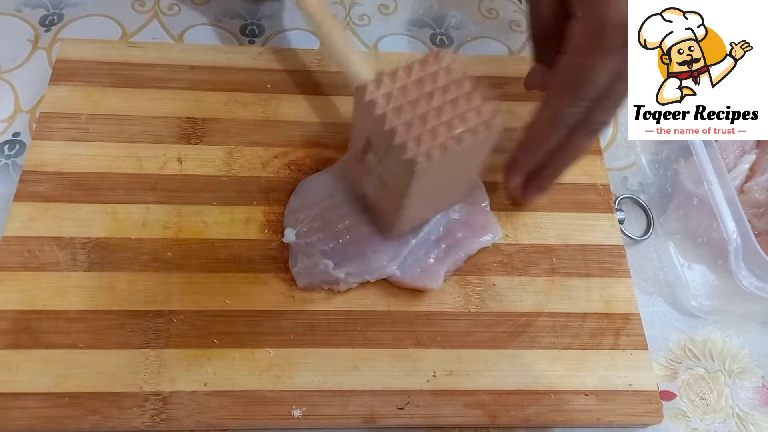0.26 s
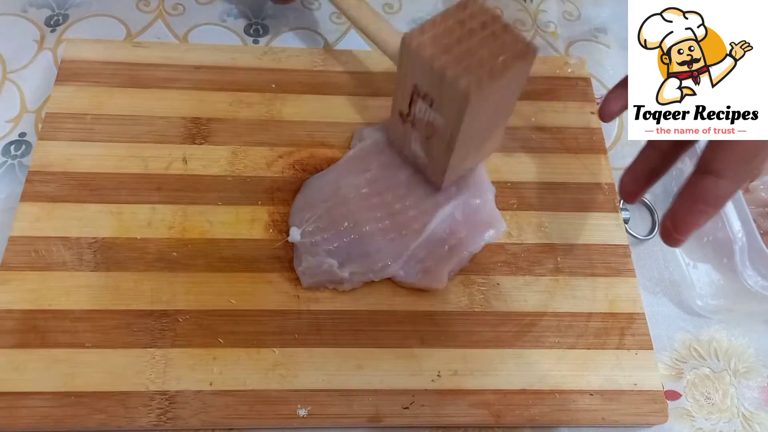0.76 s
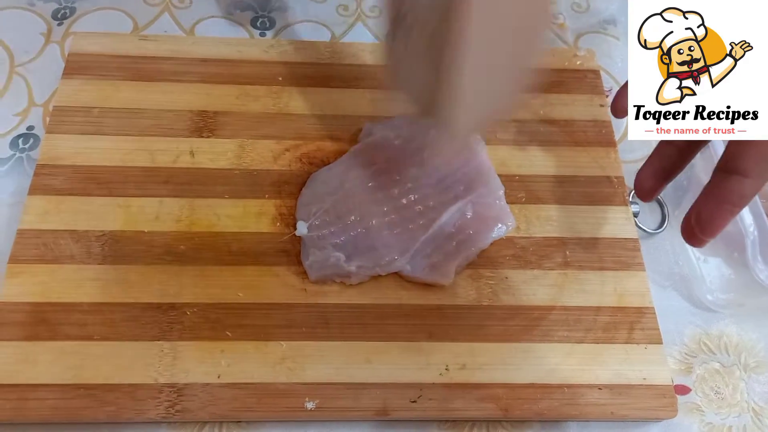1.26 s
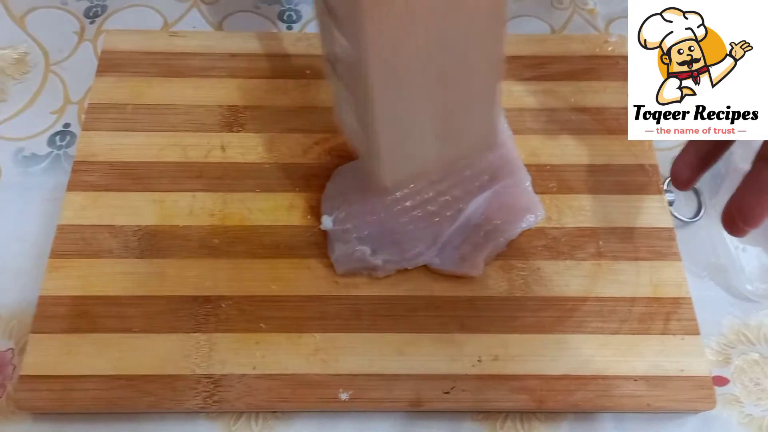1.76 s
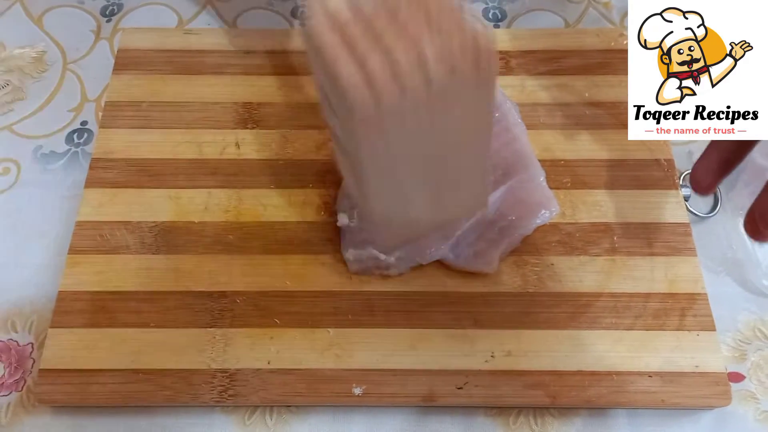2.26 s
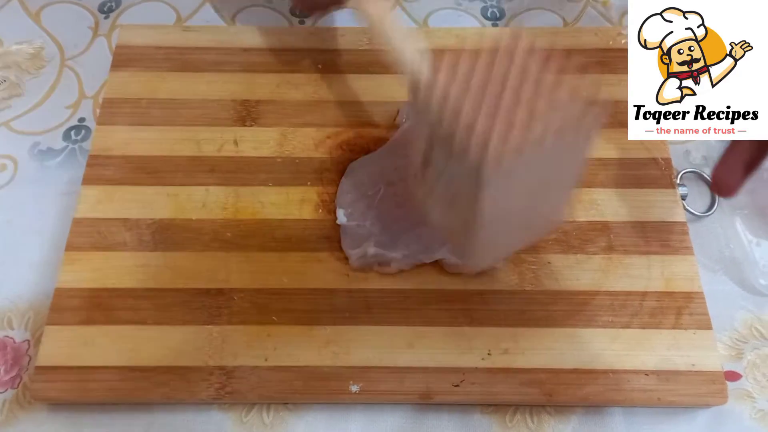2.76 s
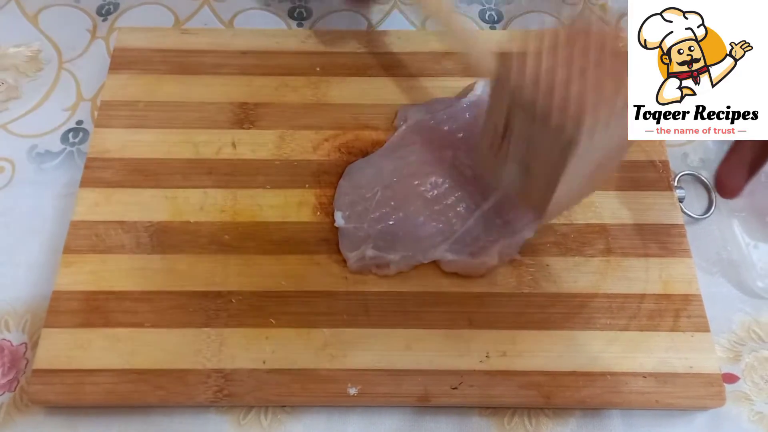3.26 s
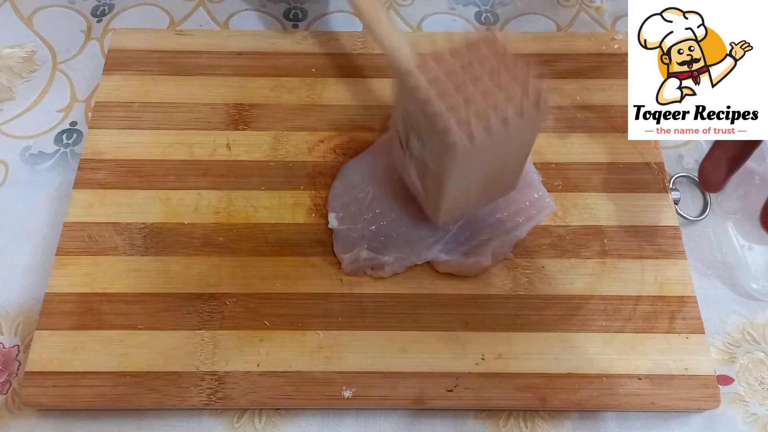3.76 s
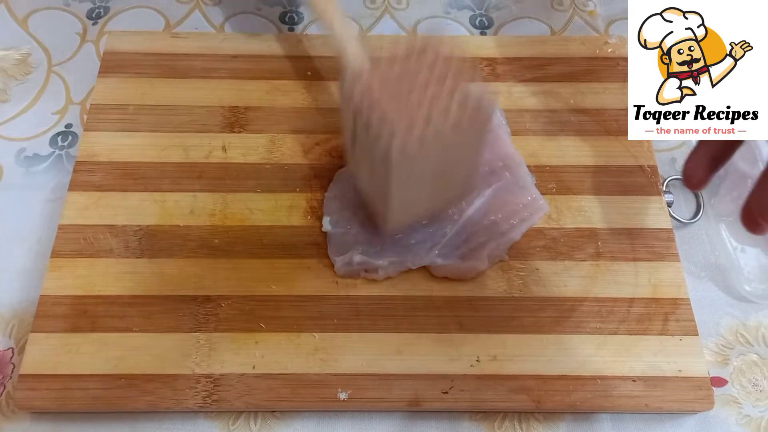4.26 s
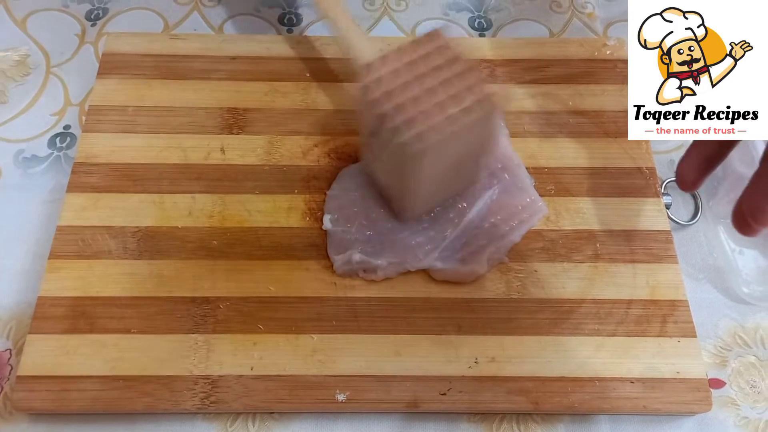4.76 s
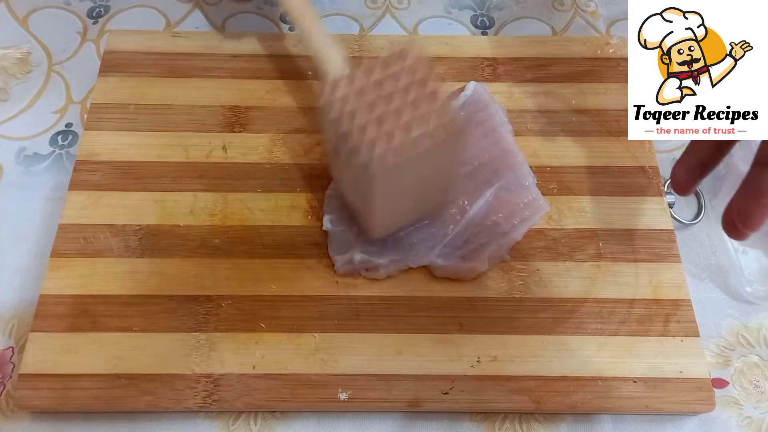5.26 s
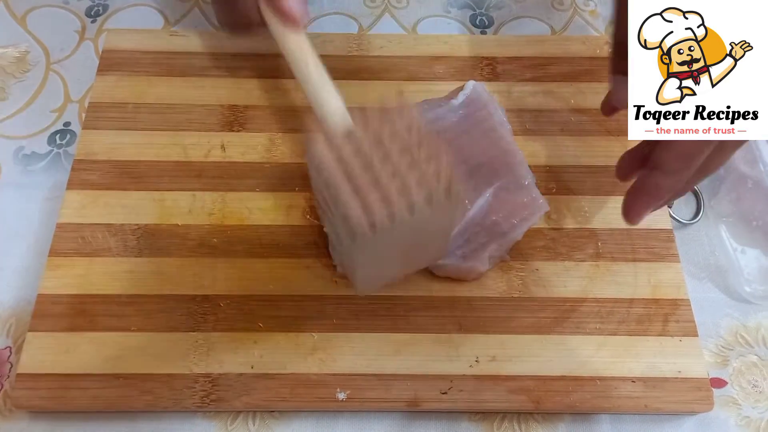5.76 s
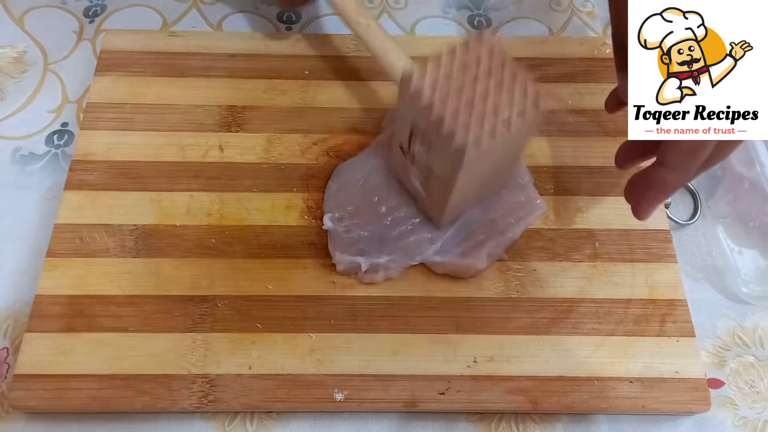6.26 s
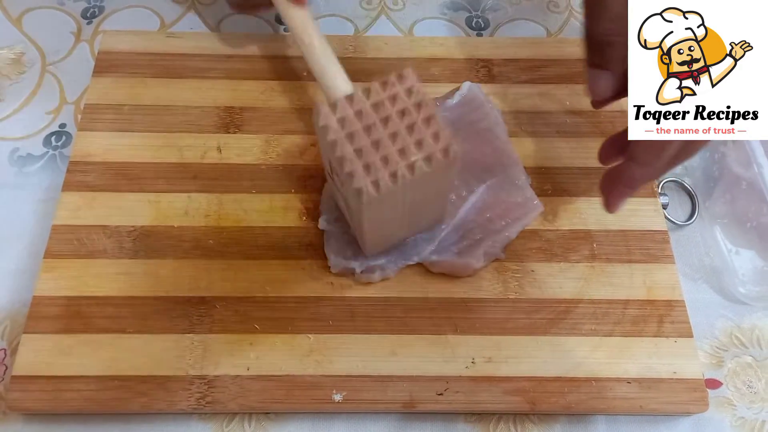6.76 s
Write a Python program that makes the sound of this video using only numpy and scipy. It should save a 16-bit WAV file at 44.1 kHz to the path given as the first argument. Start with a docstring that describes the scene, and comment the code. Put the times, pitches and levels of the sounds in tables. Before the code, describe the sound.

A wooden mallet pounds raw meat on a wooden cutting board, close to a stereo microphone in a small kitchen. The first blow is already under way at 0 seconds, and the others follow about every 0.25 to 0.29 seconds, slightly faster later, until the last near 6.75. Each is a heavy low thump that fades within a fraction of a second, with a dry wooden knock, a sharp crack and a brief wet slap on top. Strength and tone vary: knocking blows around 0.8 to 1.1, 3.0 to 3.2 and 5.5, duller ones around 3.5 to 4.0, weaker ones at 5.0 and 5.25, and a strong final one. Short reflections and a small diffuse tail surround them. Faint rustles occur near 1.8, 2.8, 3.6, 3.8, 5.8 and 6.9, with a thin scrape at 5.05, over very quiet rumble and hiss.

```python
"""A wooden mallet pounds raw meat on a wooden board, close to a stereo microphone in a small kitchen.
Each blow sums decaying sine modes (board and table thump, wood knocks) and shaped noise (crack, wet slap
and the slap's treble). A mirrored echo and a diffuse noise tail from the walls follow after a short gap.
Faint rustles, one thin scrape and the low rumble and hiss of the quiet room are filtered noise."""
import sys
import numpy as np
from scipy import signal
from scipy.fft import rfft, irfft, next_fast_len
from scipy.io import wavfile
from scipy.ndimage import map_coordinates

SR = 44100
rng = np.random.default_rng(int(sys.argv[2]) if len(sys.argv) > 2 else 0)


def convert_level_to_amplitude(level_db):
    """Map a level in decibels to its linear amplitude factor."""
    exponent = np.asarray(level_db, float) / 20
    return 10 ** exponent


def to_wav(s):
    """Save 16-bit WAV."""
    ch = np.atleast_2d(s).T  # columns
    pcm = np.round(np.clip(ch, -1, 1) * 32767)  # PCM
    wavfile.write(sys.argv[1], SR, pcm.astype(np.int16))


N = 308259
BLOW_LENGTH = SR // 2  # samples kept of each blow, and of each rustle

# Blows of the mallet: t/s, thump level/dB, board knock level/dB, mallet knock level/dB,
# crack level/dB, wet slap level/dB
BLOWS = [(-0.0221, -16.5, -43, -34, -34.5, -32.5), (0.2536, -19.5, -26.5, -21.5, -34.5, -30.5),
         (0.541, -16.5, -29.5, -27, -29, -28), (0.82, -16, -19.5, -19.5, -30, -33),
         (1.1054, -14.5, -20, -20.5, -34.5, -36.5), (1.3777, -14, -30, -25, -33.5, -26),
         (1.6533, -17, -36.5, -29.5, -41.5, -37.5), (1.918, -14, -22, -21, -32.5, -29.5),
         (2.1804, -16, -18, -23.5, -26, -33.5), (2.4394, -13, -19, -24, -35, -34),
         (2.708, -18.5, -32.5, -29, -39, -33.5), (2.9737, -16, -22, -18, -29, -34.5),
         (3.2342, -13.5, -22, -16, -24.5, -29.5), (3.4825, -15.5, -36.5, -36, -41, -31),
         (3.7479, -17, -39, -29.5, -44.5, -31.5), (3.9883, -19, -38.5, -43.5, -43, -30.5),
         (4.2319, -13, -25, -22.5, -33.5, -32), (4.4932, -12, -31, -33, -35, -30.5),
         (4.7529, -12, -25.5, -21, -35.5, -25.5), (4.999, -21, -40, -38.5, -37.5, -29.5),
         (5.2529, -20.5, -34, -33, -44.5, -39), (5.4818, -12.5, -19.5, -21.5, -26, -28),
         (5.752, -14.5, -22.5, -28, -37.5, -38.5), (6.0177, -15, -33.5, -21.5, -34, -28),
         (6.2791, -17.5, -27.5, -24.5, -34.5, -28.5), (6.517, -15, -23.5, -26.5, -32.5, -24.5),
         (6.7555, -11, -24, -19.5, -31.5, -26)]
# Bass modes of board, table and room air, before each blow's tilt:
# f/Hz, level/dB, early decay t60/s, polarity (+1 or -1)
THUMP_MODES = [(72.1, -24.5, .289, -1), (81.6, -15, .2, -1), (103.4, -19.8, .156, 1),
               (118.2, -15.8, .265, 1), (124.1, -11.3, .182, 1), (133.2, -25.9, .6, 1),
               (139.1, -31.8, .6, -1), (162, -18.1, .185, 1), (177.9, -20.4, .249, -1),
               (191, -14.7, .172, -1), (214.3, -11, .153, -1), (228.5, -4.1, .158, -1), (235, -1, .069, 1),
               (243.8, -3.7, .155, -1), (272.7, -8, .15, -1), (289.7, -22.6, .314, -1),
               (297.7, -1.9, .049, 1), (322.7, -12.7, .176, 1), (332.3, -19.4, .232, 1),
               (369.8, -11.3, .069, -1)]
# Knock modes, relative levels and centre values before scatter: f/Hz, level/dB, t60/s
TABLE_MODES = [(422, 0, 0.062), (530, 3, 0.038), (654.5, -6, 0.011)]
BOARD_MODES = [(702, -4, 0.0033), (777, 1, 0.021), (930, 10, 0.013)]
MALLET_MODES = [(1184, 2, 0.016), (1250, 4, 0.013), (1400, -11, 0.023), (1573, -16, 0.052)]
# Noise spectra of the crack, the wet slap and the slap's treble: f/Hz, relative level/(dB per Hz)
CRACK_SPECTRUM = [(1750, -20), (2050, 12), (2700, 4.5), (3800, 6), (4600, 4.5), (6000, -32.5)]
SLAP_SPECTRUM = [(3000, -21), (4500, -4), (6400, 7), (6900, 2.5), (7300, -15), (8000, -29)]
SLAP_TREBLE_SPECTRUM = [(6500, -30), (7300, -8.5), (8200, -4.5), (10000, 1), (13000, -1), (15300, -9),
                        (15900, -20), (16800, -42)]
# Share of the blow sent to the walls: f/Hz, level/dB
WALL_SEND = [(60, -1.5), (250, -24), (500, -1), (1000, -9.5), (3000, -2), (5500, -8), (6700, -7),
             (7400, -15), (9000, -7.5), (12000, -6), (15300, -3), (15800, -42)]
# Early decay of the kitchen's reverberation: f/Hz, t60/s
KITCHEN_DECAY = [(150, 0.32), (400, 0.22), (1000, 0.22), (3000, 0.21), (6500, 0.23), (12000, 0.21)]
# Likeness of left and right in stereo noise: f/Hz, correlation (0 to 1)
LIKENESS = [(100, .97), (300, 0.43), (600, 0.54), (900, .6), (1400, .2), (3000, 0.01)]
# Faint rustles between blows: t/s, length/s, hiss level/dB, hollow tone level/dB
RUSTLES = [(1.835, 0.041, -68, -66), (2.845, .05, -76.5, -89.5), (3.64, 0.024, -81, -89.5),
           (3.83, 0.035, -65, -57), (5.84, 0.076, -71, -76), (6.9, 0.076, -75.5, -94)]
# Noise spectrum of the rustles' hiss: f/Hz, relative level/(dB per Hz)
RUSTLE_HISS = [(2200, -30.5), (3300, -4), (4500, -6.5), (6300, -1), (6900, -2), (7300, -33)]
# Resonances of the rustles' hollow tone: f/Hz, width/Hz, relative level/dB
HOLLOW_BANDS = [(862, 140, -1.5), (1470, 260, -5.5)]
# One thin scrape: t/s, length/s, level/dB
SCRAPE = (5.055, 0.075, -59.5)
# Resonances of the scrape's three streaks: f/Hz, width/Hz, relative level/dB
STREAK_BANDS = [(1870, 140, -4), (3320, 230, -1.5), (4020, 250, -1)]
# Noise spectrum of the quiet room: f/Hz, relative level/(dB per Hz)
ROOM_SPECTRUM = [(25, -29.5), (50, -5), (73, 7.5), (100, -3), (130, -1.5), (170, -9.5), (220, -12.5),
                 (310, -20), (450, -27), (1000, -33.5), (3000, -40), (6500, -41), (7300, -43),
                 (12000, -48.5), (15400, -45.5), (15700, -81.5)]
# Balance of the microphone's two ports: f/Hz, left minus right level/dB
PORT_BALANCE = [(100, 0.5), (1000, -0.7), (2500, -1.5), (5000, -2), (9000, -1), (13000, 0)]


def mallet():
    """Superposition: a blow is the sum of its modes, its noise bursts and their reflections."""
    out = np.zeros((2, N + 2 * BLOW_LENGTH))
    t = np.arange(BLOW_LENGTH) / SR
    for s, thump_db, board_db, mallet_db, crack_db, slap_db in BLOWS:
        treble_db = slap_treble_level(thump_db, board_db, slap_db)
        low = convert_level_to_amplitude(thump_db) * thump(t, tilt_db=0.5, side_db=0.5)
        sharp = contact(t, thump_db, board_db, mallet_db, crack_db, slap_db, treble_db)
        direct = low + sharp
        start = BLOW_LENGTH + round(s * SR)
        out[:, start:start + BLOW_LENGTH] += direct + echo(sharp) + walls(direct, gap=0.013, blur=0.19)
    return out[:, BLOW_LENGTH:BLOW_LENGTH + N]


def thump(t, tilt_db, side_db):
    """Modal excitation: the bass modes start together, tilted in pitch and side by where the mallet lands."""
    hz, db, t60, polarity = np.transpose(THUMP_MODES)[:, :, None, None]
    octave = np.log2(hz / 200)
    tilt, bend = tilt_db * rng.standard_normal(2)
    side = side_db * rng.standard_normal(2)
    db = db + tilt * octave + bend * octave ** 2
    db = db + (side[0] + side[1] * octave) * [[1], [-1]]  # left, right
    modes = polarity * convert_level_to_amplitude(db - 60 * t / t60) * np.sin(2 * np.pi * hz * t)
    return np.sum(modes, 0) * fading(t, seconds=0.25)


def contact(t, thump_db, board_db, mallet_db, crack_db, slap_db, treble_db):
    """Impact sequence: the table starts first, the wet skin bursts next, then wood meets wood."""
    wet = np.maximum(t - 0.0008, 0)
    hard = np.maximum(t - 0.0013, 0)  # the meat gives way before wood feels wood
    table = convert_level_to_amplitude(thump_db - 24) * knock(t, TABLE_MODES, scatter_db=7.5, attack=0.0073, turn=0.31)
    board = convert_level_to_amplitude(board_db) * knock(hard, BOARD_MODES, scatter_db=4.5, attack=0.00087, turn=0.29)
    head = convert_level_to_amplitude(mallet_db) * knock(hard, MALLET_MODES, scatter_db=4.0, attack=0.00036, turn=1.0)
    crack = convert_level_to_amplitude(crack_db) * burst(hard, CRACK_SPECTRUM, rise=0.00067, t60=0.0071, after_db=-9)
    slap = convert_level_to_amplitude(slap_db) * burst(wet, SLAP_SPECTRUM, rise=0.00034, t60=0.0059, after_db=-15)
    treble = convert_level_to_amplitude(treble_db) * burst(wet, SLAP_TREBLE_SPECTRUM, rise=0.00028, t60=0.007, after_db=-17.0)
    return table + board + head + crack + slap + treble


def knock(t, modes, scatter_db, attack, turn):
    """Damped free vibration: short wood modes, each side with its own strength and phase (turn in rad)."""
    hz, db, t60 = np.transpose(modes)[:, :, None, None]
    hz = hz * (1 + 0.035 * rng.standard_normal(hz.shape))
    db = db + scatter_db * rng.standard_normal(hz.shape)
    db = db + 1.5 * rng.standard_normal((len(modes), 2, 1))  # left and right apart
    lead = turn * rng.standard_normal((len(modes), 2, 1))
    # the minus sign makes a mode without phase lead start with a dip in pressure
    ring = -convert_level_to_amplitude(db - 60 * t / t60) * np.sin(2 * np.pi * hz * t + lead)
    return first_10ms(ring.sum(0) * (1 - np.exp(-t / attack)) ** 2)


def burst(t, spectrum, rise, t60, after_db):
    """Two-stage decay of a noise puff: a sharp spike, then a weaker, slower fizz."""
    spike = convert_level_to_amplitude(-60 * t / t60)
    fizz = convert_level_to_amplitude(after_db - 60 * t / 0.031)
    onset = (1 - np.exp(-t / rise)) ** 2
    return first_10ms(pair(len(t), spectrum) * onset * (spike + fizz))


def slap_treble_level(thump_db, board_db, slap_db):
    """Level relation: the slap's treble follows the slap and is lower on heavy blows (dB)."""
    return -10 + slap_db - 0.08 * board_db - 0.3 * thump_db


def echo(sharp):
    """Specular reflection: the nearest hard surface returns the sharp part, mirrored left to right."""
    delay = round(0.015 * SR)
    return convert_level_to_amplitude(-16) * np.pad(sharp[::-1], ((0, 0), (delay, 0)))[:, :BLOW_LENGTH]


def walls(x, gap, blur):
    """Diffuse reverberation: after a gap in s a new noise tail, coloured by the blow, dies away."""
    # the walls gather the blow from all sides, so only its broad colour reaches them
    total = np.cumsum(np.mean(np.abs(rfft(x)) ** 2, 0))
    bins = np.arange(len(total))
    low = bins / (1 + blur)
    high = bins * (1 + blur) + 1
    power = (np.interp(high, bins, total) - np.interp(low, bins, total)) / (high - low)
    bin_hz = bins * SR / BLOW_LENGTH
    noise = filtered(pair(BLOW_LENGTH, WALL_SEND), lambda hz: np.interp(hz, bin_hz, np.sqrt(power)))
    # each frequency decays at its own rate
    hz, frames, z = signal.stft(noise, SR, nperseg=256)
    decay = convert_level_to_amplitude(-60 * frames / along(KITCHEN_DECAY, hz)[:, None])
    tail = signal.istft(z * decay, SR, nperseg=256)[1][:, :BLOW_LENGTH]
    late = np.maximum(np.arange(BLOW_LENGTH) / SR - gap, 0)
    onset = 1 - np.exp(-late / 0.0028)
    return convert_level_to_amplitude(-26.0) * tail * onset * fading(late, seconds=0.15)


def fading(t, seconds):
    """Accelerating decay: the loss in dB grows as time cubed, reaching 10 dB at the given seconds."""
    return convert_level_to_amplitude(-10 * (t / seconds) ** 3)


def rustles():
    """Filtered noise: each rustle mixes a high hiss with a hollow tone."""
    attack, t60 = 0.0042, 0.2  # s
    out = np.zeros((2, N))
    for s, length, hiss_db, hollow_db in RUSTLES:
        out += convert_level_to_amplitude(hiss_db) * rub(s, length, lambda hz: convert_level_to_amplitude(along(RUSTLE_HISS, hz)), attack, t60)
        out += convert_level_to_amplitude(hollow_db) * rub(s, length, bands(HOLLOW_BANDS), attack, t60)
    return out


def scrape():
    """Resonant filtering: one thin scrape sings in three streaks of noise."""
    s, length, db = SCRAPE
    return convert_level_to_amplitude(db) * rub(s, length, bands(STREAK_BANDS), attack=0.0075, t60=0.13)


def rub(s, length, colour, attack, t60):
    """Amplitude modulation: coloured noise rises, holds unevenly for its length and dies away."""
    t = np.arange(BLOW_LENGTH) / SR
    shape = (1 - np.exp(-t / attack)) ** 2 * convert_level_to_amplitude(-60 * np.maximum(t - length, 0) / t60)
    uneven_db = 1.5 * map_coordinates(rng.standard_normal(64), [np.linspace(0, 40, BLOW_LENGTH)])
    noise = unit(filtered(rng.standard_normal((2, BLOW_LENGTH)), colour))
    noise = noise * convert_level_to_amplitude(uneven_db) * shape
    return np.pad(noise, ((0, 0), (round(s * SR), N)))[:, :N]


def bands(table):
    """Superposed resonances: a colour made of peaks with wide skirts."""
    return lambda f: sum(convert_level_to_amplitude(db) / (1 + (2 * (f - hz) / width_hz) ** 2) for hz, width_hz, db in table)


def hush():
    """Stationary noise: the quiet room is a low rumble and a trace of hiss."""
    return convert_level_to_amplitude(-64.0) * unit(pair(N, ROOM_SPECTRUM))


def pair(size, spectrum):
    """Partial coherence: stereo noise, alike in the bass and unrelated in the treble."""
    def mid_side(hz):
        turn = np.arccos(np.clip(along(LIKENESS, hz), 0, 1)) / 2
        return convert_level_to_amplitude(along(spectrum, hz)) * [np.cos(turn), np.sin(turn)]

    mid, side = filtered(rng.standard_normal((2, size)), mid_side)
    return np.array([mid + side, mid - side])


def filtered(x, response):
    """Linear filtering: the spectrum of x is multiplied by a response of frequency."""
    m = next_fast_len(x.shape[-1] + 8192)
    return irfft(rfft(x, m) * response(np.fft.rfftfreq(m, 1 / SR)), m)[..., :x.shape[-1]]


def along(points, hz):
    """Logarithmic pitch scale: (f/Hz, value) points joined by lines on a log axis."""
    f, v = np.transpose(points)
    return np.interp(np.log(hz + 1), np.log(f + 1), v)


def unit(x):
    """Mean-square normalisation: x scaled to rms 1."""
    return x / np.sqrt(np.mean(x ** 2) + 1e-20)


def first_10ms(x):
    """Onset normalisation: x scaled so that its first 10 ms have rms 1."""
    return x / np.sqrt(np.mean(x[:, :SR // 100] ** 2))


def scene():
    """Superposition of blows, rustles, scrape and quiet room."""
    return mallet() + rustles() + scrape() + hush()


def roll_off(x):
    """The treble ends steeply here."""
    return signal.sosfilt(signal.butter(12, 16760, fs=SR, output="sos"), x)


def record(dry):
    """Band-limited transduction: the microphone's ports differ in balance and loud peaks are rounded."""
    low_hz, top_hz = 30, 16600  # the microphone's reach

    def response(hz):
        reach = (1j * hz / (low_hz + 1j * hz)) ** 2 * (hz < top_hz)
        return reach * convert_level_to_amplitude(np.outer([0.5, -0.5], along(PORT_BALANCE, hz)))

    ports = filtered(dry, response)
    rounded = ports / (1 + np.abs(ports / 0.9) ** 4) ** (1 / 4)
    return roll_off(rounded)


dry = scene()
out = record(dry)
to_wav(out)
```